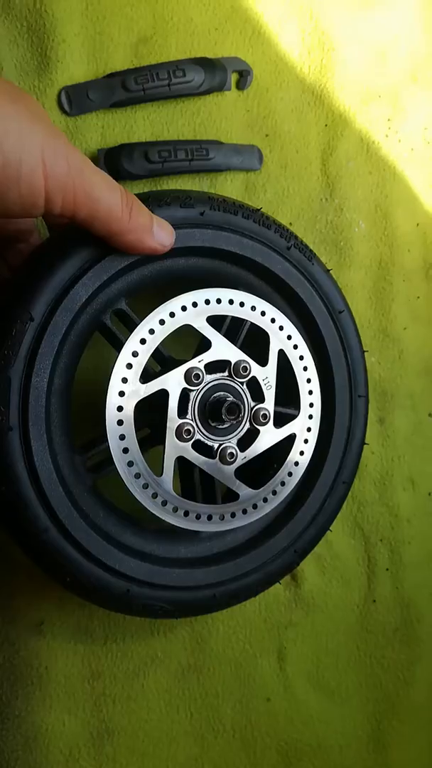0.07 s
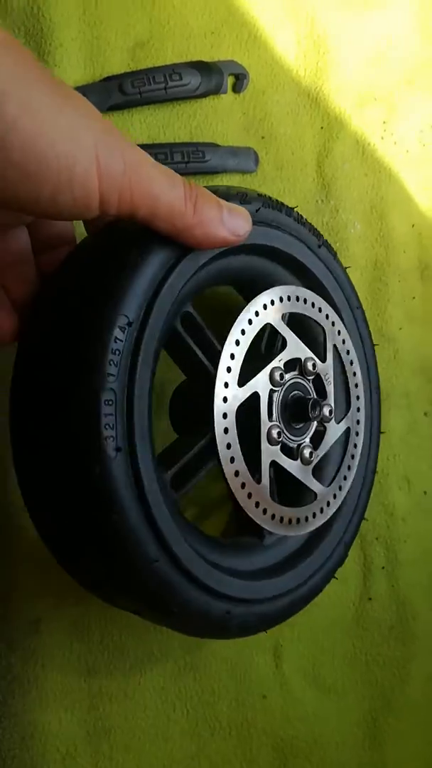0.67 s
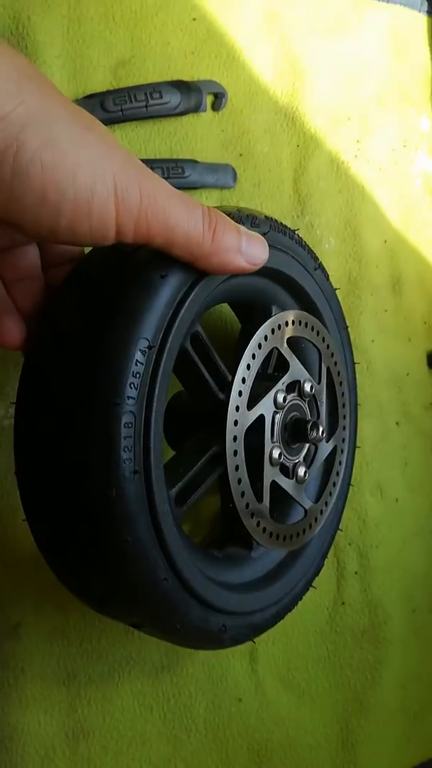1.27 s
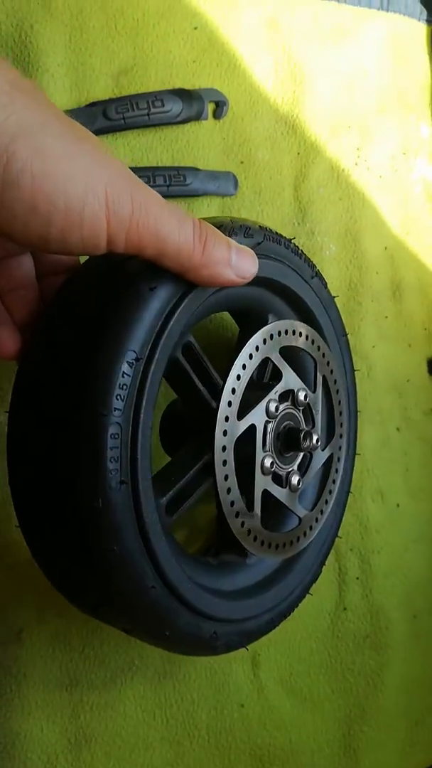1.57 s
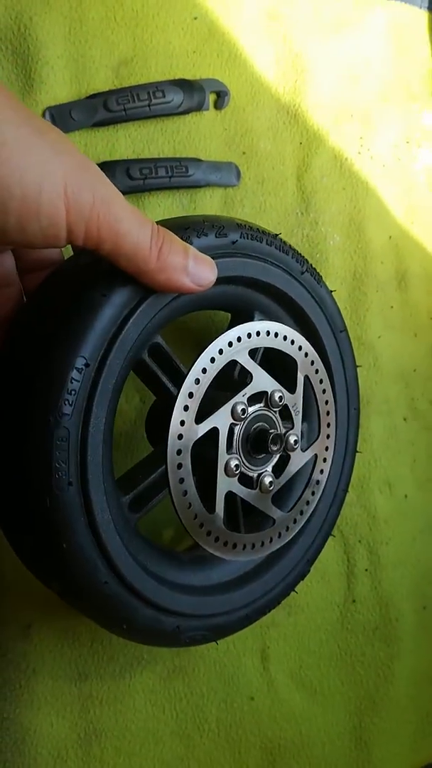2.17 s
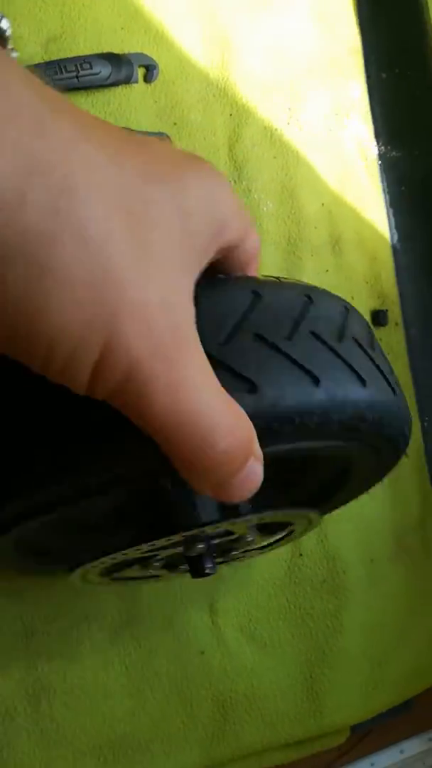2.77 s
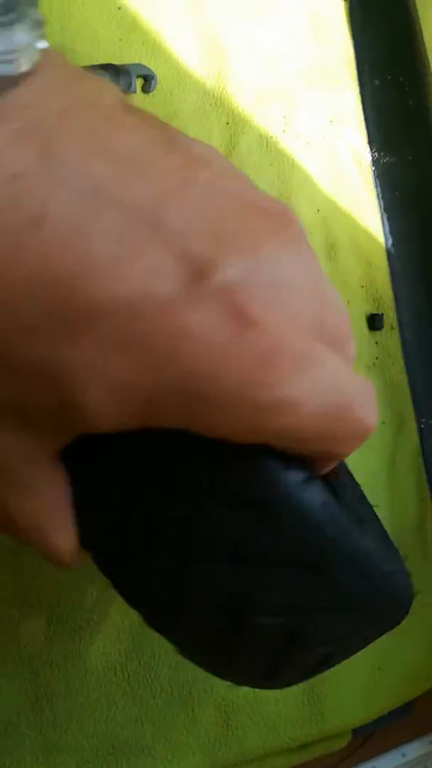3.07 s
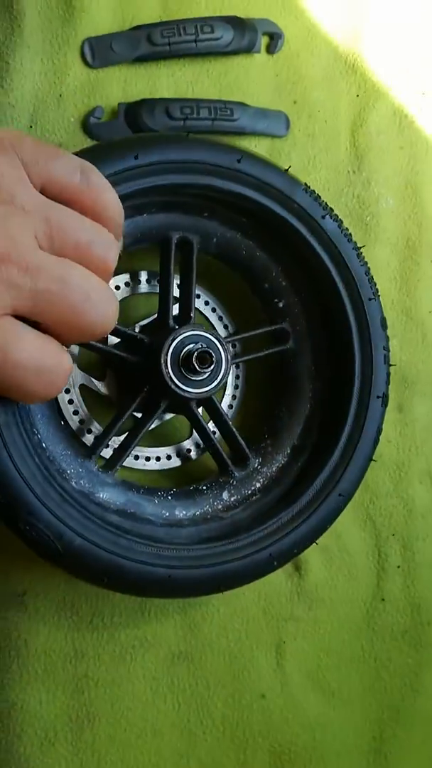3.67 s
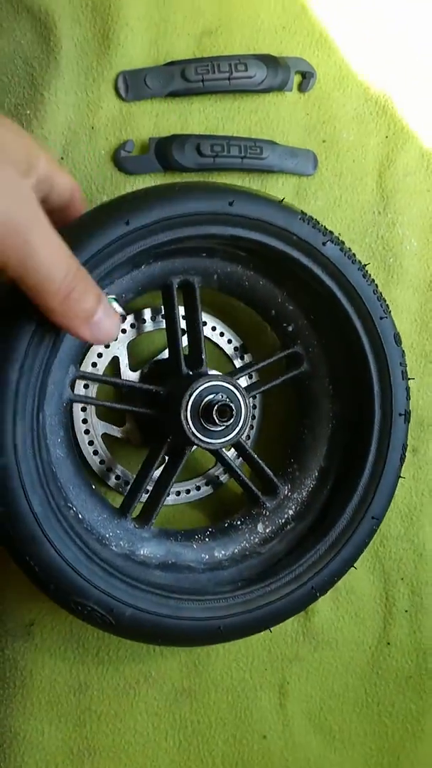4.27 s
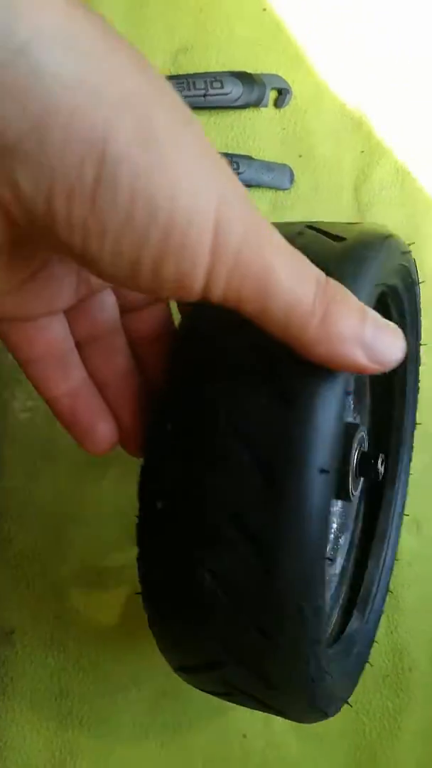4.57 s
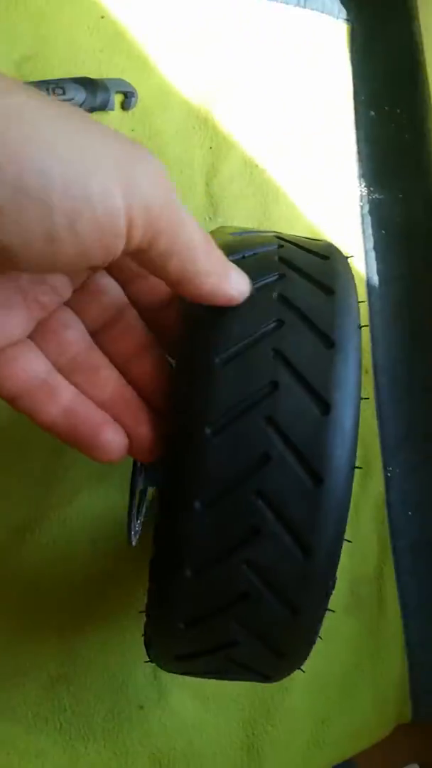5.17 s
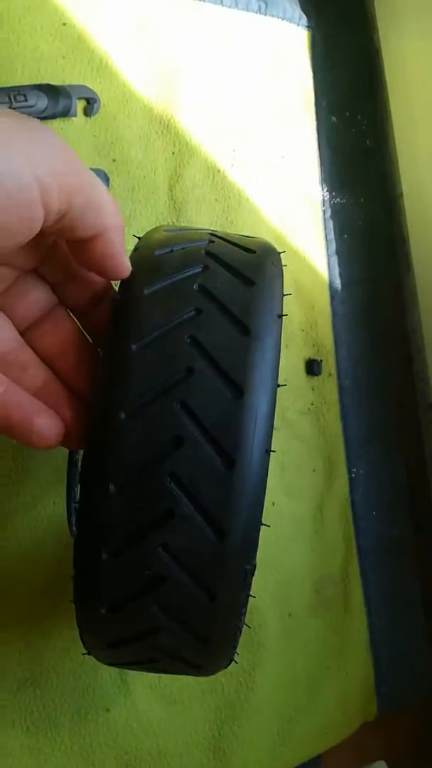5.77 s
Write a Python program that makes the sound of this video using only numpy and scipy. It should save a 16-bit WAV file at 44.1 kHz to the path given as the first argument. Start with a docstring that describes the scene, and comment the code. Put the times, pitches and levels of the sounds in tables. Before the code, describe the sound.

Dull, close thumps of a scooter wheel being turned by hand on cloth, with one bouncing, clacking landing over a faint indoor hum.

```python
"""A low hum and a faint hiss fill a small room. A scooter wheel rumbles as it is tilted and turned by hand
on a cloth-covered table, amid dull, close handling thumps, each a low swing that sinks in pitch.
Fingers tick on the wheel, and friction on the cloth gives a swish and a stick-slip rasp.
The wheel lands once: the modes of the inflated tyre boom as it bounces, and those of the metal clack.
Then the tread rolls in short runs of bumps, among further thumps of handling."""
import sys
import numpy as np
from scipy import signal
from scipy.fft import rfft, irfft
from scipy.io import wavfile

SR = 44100
rng = np.random.default_rng(int(sys.argv[2]) if len(sys.argv) > 2 else 0)


def master_out(mix):
    """Clip the mix to full scale and print it as 16-bit PCM to the path in sys.argv[1]."""
    frames = np.transpose(np.atleast_2d(mix))
    ceiling = np.clip(frames, -1, 1)
    pcm = np.round(ceiling * 32767).astype(np.int16)
    wavfile.write(sys.argv[1], SR, pcm)


N = 265217
TIME = np.arange(N) / SR


def from_db(db):
    """Amplitude grows tenfold for every 20 dB."""
    return 10 ** (np.asarray(db) / 20)


def rms_one(x):
    """Normalisation to unit rms."""
    return x / np.sqrt(np.mean(x ** 2) + 1e-20)


def peak_one(x):
    """Normalisation to unit peak."""
    return x / np.abs(x).max()


def at_hz(points, hz):
    """Interpolation of (Hz, value) points on a logarithmic frequency axis."""
    point_hz, value = np.transpose(points)
    return np.interp(np.log(hz), np.log(point_hz), value)


def cut(x, hz, kind, order):
    """Butterworth filtering, maximally flat in the passband."""
    return signal.sosfilt(signal.butter(order, np.minimum(hz, .45 * SR), kind, fs=SR, output="sos"), x)


def resonance(x, hz, width_hz, order):
    """A resonator selects a band of its excitation; the result has unit rms."""
    return rms_one(cut(x, [hz - width_hz / 2, hz + width_hz / 2], "band", order))


def add(track, start_s, sound):
    """Superposition: a sound adds to the track from its start time."""
    at = round(start_s * SR)
    track[..., at:at + sound.shape[-1]] += sound[..., :N - at]


def noise(spectrum, pan=None):
    """Partial coherence: coloured stereo noise of unit rms, alike on both sides only in the bass."""
    # Each row: frequency in Hz, correlation of left and right.
    coherence = [(60, 0.99), (130, 0.9), (290, 0.12), (640, -0.55), (1400, 0.35), (3100, 0), (15000, 0)]
    hz = np.maximum(np.fft.rfftfreq(N, 1 / SR), 1)
    mid, side = rfft(rng.standard_normal((2, N)))
    alike = np.clip(at_hz(coherence, hz), -1, 1)
    sign = np.array([[1], [-1]])
    low_hz, high_hz = spectrum[0][0], spectrum[-1][0]
    skirts = np.minimum(hz / low_hz, 1) ** 2 * np.minimum(high_hz / hz, 1) ** 2
    gain = from_db(at_hz(spectrum, hz)) * skirts
    if pan:
        tilt = from_db(sign * at_hz(pan, hz) / 2)
        gain = gain * tilt / tilt.mean(axis=0)
    channels = np.sqrt(1 + alike) * mid + np.sqrt(1 - alike) * sign * side
    return rms_one(irfft(gain * channels, N))


def strokes(movements, rise_db_per_s, fall_db_per_s):
    """Exponential envelopes: each movement sets in, glides between two levels and dies away."""
    gain = np.zeros(N)
    for start, end, start_db, end_db in movements:
        level_db = np.interp(TIME, [start, end], [start_db, end_db])
        drop_db = rise_db_per_s * np.maximum(start - TIME, 0) + fall_db_per_s * np.maximum(TIME - end, 0)
        gain += from_db(np.maximum(level_db - drop_db, -200))
    return gain


def background(hum_hz=131.2, whine_hz=14408):
    """Narrow-band noise wavers, giving a low hum amid broadband hiss and a very faint whine."""
    # Each row: frequency in Hz, relative spectral density in dB.
    air_spectrum = [(15, -29.5), (25, 0), (59, -6), (92, -18), (134, -11), (153, -20), (185, -15),
                    (240, -24), (326, -24), (420, -26.5), (1400, -29.5), (2350, -30.5), (4500, -32.5),
                    (8590, -34.8), (14800, -35), (16000, -37)]
    # Faint resonances in the hiss. Each row: centre in Hz, bandwidth in Hz, level in dB.
    air_tones = [(2380, 160, -87), (3500, 160, -91)]
    # Each row: time in seconds, level in dB.
    hum_levels = [(0.1, -74), (0.35, -62), (1.1, -66.5), (1.8, -71), (6.0, -70.5)]
    tones = sum(from_db(db) * resonance(rng.standard_normal((2, N)), hz, width_hz, order=2)
                for hz, width_hz, db in air_tones)
    hum = resonance(rng.standard_normal(N), hum_hz, width_hz=16, order=2)
    hum_db = np.interp(TIME, *np.transpose(hum_levels))
    whine = rms_one(np.sin(2 * np.pi * whine_hz * TIME))
    return from_db(-65.8) * noise(air_spectrum) + tones + from_db(hum_db) * hum + from_db(-93) * whine


def rumble():
    """Handling noise: the wheel vibrates at low frequencies while it shifts in the hand."""
    # Each row: start and end in seconds, first and last level in dB.
    shifts = [(0.29, 1.503, -54.5, -55.5), (1.69, 2.499, -61.5, -60.5), (2.56, 2.67, -57, -50),
              (3.348, 3.625, -54, -58), (4.009, 4.94, -63.5, -60), (5.19, 5.35, -57.5, -55)]
    # Each row: frequency in Hz, relative spectral density in dB.
    spectrum = [(25, -6), (50, 7), (90, -2.5), (160, -6.5), (300, -21), (600, -19)]
    return strokes(shifts, rise_db_per_s=141, fall_db_per_s=116) * noise(spectrum)


def bump(db, start_hz, edge_hz, relaxed_hz=54.7, sag_s=0.0056, decay_s=0.011):
    """A damped oscillator: one low swing whose pitch sinks as it dies away."""
    t = TIME[:6000]
    hz = relaxed_hz + (start_hz - relaxed_hz) * np.exp(-t / sag_s)
    swing = np.sin(2 * np.pi * np.cumsum(hz) / SR) * np.exp(-t / decay_s)
    softened = cut(swing, edge_hz, "low", order=3)  # a softer contact has a lower edge
    bass_cut_hz = 30 + 4.5 * max(db + 22, 0)  # above -22 dB a contact is too brief to push deep bass
    return from_db(db) * peak_one(cut(softened, bass_cut_hz, "high", order=2))


def smack(edge_hz):
    """Abrupt contact gives one band-limited pulse, opposite in sign to the low swing."""
    impulse = signal.unit_impulse(1000) + 1e-18
    pulse = cut(impulse, edge_hz, "low", order=5)
    return -peak_one(cut(pulse, 0.088 * edge_hz, "high", order=2))


def thumps():
    """Impact excitation: dull, close handling thumps, each a smack and a low swing that sinks in pitch."""
    # Each row: start in seconds, level in dB, initial pitch in Hz, upper spectral edge in Hz,
    # smack in dB relative to the bump.
    contacts = [(0.658, -41.5, 79, 756, 3), (0.681, -45, 220, 730, 7.5), (1.255, -32.0, 89, 674, -37),
                (1.47, -40, 50.3, 160, -27), (1.736, -33, 80.5, 176, -17), (1.777, -44.5, 223, 614, -0.5),
                (1.7803, -34.5, 128, 423, -9.5), (1.88, -40, 99, 262, -26), (1.929, -36, 145, 534, -6.5),
                (2.02, -38, 84, 1150, -15), (2.159, -46.5, 115, 700, -33), (2.5824, -22, 141, 1900, -19),
                (2.5852, -9.5, 234.3, 1020, -5), (2.6205, -15.5, 292, 2200, -12.5),
                (2.642, -31, 173, 1600, -4), (3.105, -39.0, 100, 230, -31), (3.2767, -36, 197, 652, -5.5),
                (4.153, -43, 142, 242, -31), (4.316, -46, 70, 210, -13), (4.496, -20.5, 184, 724, -25),
                (4.5192, -29, 200, 437, -35), (4.7461, -23, 208, 590, -4.5), (4.9117, -20, 233, 426, -9.5),
                (4.9201, -33, 207, 440, -22), (4.9405, -31, 116, 355, -11), (4.976, -31, 235, 310, -37),
                (4.9925, -29, 220, 292, -32), (5.008, -32, 103, 230, -7), (5.185, -38.5, 116, 324, -4),
                (5.227, -31, 184, 260, -23), (5.2473, -27, 219, 587, -30), (5.279, -36.5, 185, 540, -21),
                (5.292, -38, 145, 430, -5), (5.312, -42, 295, 430, -24), (5.3275, -23.5, 213, 426, -35)]
    out = np.zeros(N)
    for start, db, start_hz, edge_hz, smack_db in contacts:
        add(out, start, bump(db, start_hz, edge_hz))
        add(out, start, from_db(db + smack_db) * smack(edge_hz))
    return out


def from_right(x, lag_s, shade_db, shade_hz):
    """Time and level differences: the left lags and has less treble; negative values swap the sides."""
    bass = cut(x, shade_hz, "low", order=1)
    upper = x - bass
    left = np.interp(TIME - lag_s / 2, TIME, bass + from_db(-shade_db) * upper)
    right = np.interp(TIME + lag_s / 2, TIME, bass + from_db(shade_db) * upper)
    return np.array([left, right])


def room(x, t60, build_s=0.008, size=22050):
    """Reverberation: diffuse reflections build up quickly and decay exponentially."""
    # Each row: frequency in Hz, relative spectral density in dB.
    spectrum = [(100, -4.5), (200, -0.5), (500, -6), (1000, -4.5), (2500, -8), (6000, -13.5), (14000, -34)]
    t = TIME[:size]
    tail = noise(spectrum)[:, :size] * from_db(-60 * t / t60) * (1 - np.exp(-t / build_s))
    tail /= np.sqrt(np.sum(tail ** 2) / 2)
    return signal.fftconvolve(x[None], tail, axes=1)[:, :N]


def ticks(attack_s=0.0003, size=6000):
    """Light taps and scuffs make noise transients, dull from a fingertip, bright from nail or fitting."""
    # Each row: start in seconds, peak in dB, lower and upper band edge in Hz, decay in seconds,
    # left over right in dB.
    taps = [(2.338, -51, 7000, 9000, 0.024, -1), (2.35, -50.5, 700, 5000, 0.0036, 11),
            (2.347, -53.5, 330, 440, 0.027, -2), (2.507, -39.5, 3030, 5000, 0.0014, 0),
            (2.5846, -36, 1600, 2210, 0.00071, -2), (3.296, -33.5, 2480, 3520, 0.0032, 5),
            (3.310, -34, 2010, 3250, 0.0056, 0), (3.31, -45, 5900, 6560, 0.0047, 12),
            (3.5184, -46.5, 1500, 11800, 0.00086, -12), (3.5186, -47.5, 1020, 1640, 0.0013, -4),
            (4.064, -63, 700, 1030, 0.0074, -5), (4.08, -63, 1000, 4000, 0.058, 0),
            (4.113, -61, 7000, 11000, 0.0057, -2), (4.241, -40, 167, 260, 0.0097, -0.5),
            (4.253, -60.5, 7500, 10500, 0.0053, 6), (4.324, -51, 173, 284, 0.025, 3),
            (4.495, -58, 1400, 2000, 0.0018, -9), (4.496, -56, 740, 950, 0.0079, -7),
            (4.7455, -59.5, 1200, 1900, 0.0014, -6), (4.91, -55, 1410, 1970, 0.002, -10),
            (4.912, -52.5, 680, 990, 0.0045, -6), (5.245, -61, 900, 1900, 0.0015, 0),
            (5.955, -60.5, 990, 3980, 0.071, 2)]
    out, t = np.zeros((2, N)), TIME[:size]
    for start, db, low_hz, high_hz, decay_s, pan_db in taps:
        burst = rng.standard_normal((2, size)) * np.exp(-t / decay_s) * (1 - np.exp(-t / attack_s))
        snap = peak_one(cut(burst, [low_hz, high_hz], "band", order=2))
        sides = from_db([[pan_db / 2], [-pan_db / 2]])
        add(out, start, from_db(db) * sides * snap)
    return out


def brushing(grain_db=1.3, grain_hz=110):
    """Sliding friction: rubber drags over the fibres of the cloth in a slightly grainy swish."""
    # Each row: start and end in seconds, first and last level in dB.
    drags = [(2.507, 2.6, -63, -62), (2.62, 2.695, -51, -53), (3.304, 3.369, -57, -56)]
    # Each row: frequency in Hz, relative spectral density in dB.
    spectrum = [(180, -18), (300, -14.5), (455, -31.5), (614, -17), (1280, -5.5), (1390, -7.5),
                (2650, -9.5), (3460, -6.5), (5900, -15), (7500, -11.5), (11000, -22), (16000, -28.5)]
    # Each row: frequency in Hz, left over right in dB.
    pan = [(400, 1.5), (1300, -4.5), (2400, -2), (4400, -3), (8100, 41.5), (15000, 9.5)]
    grain = from_db(grain_db * rms_one(cut(rng.standard_normal(N), grain_hz, "low", order=2)))
    return strokes(drags, rise_db_per_s=903.5, fall_db_per_s=251) * grain * noise(spectrum, pan)


def rasp(slips_per_s=690, spread_db=3):
    """Stick-slip friction: rubber catches on the cloth, and its uneven slips excite broad resonances."""
    # Each row: centre in Hz, bandwidth in Hz, relative level in dB before the high-pass.
    bands = [(3150, 240, 2.5), (3870, 600, 2), (5070, 1800, -2)]
    # Each row: start and end in seconds, first and last level in dB.
    catches = [(2.511, 2.69, -64, -64), (3.345, 3.38, -61, -58)]
    slipping = rng.random(N) < slips_per_s / SR
    slips = slipping * from_db(spread_db * np.clip(rng.standard_normal(N), -2, 2)) + 1e-18
    ringing = sum(from_db(db) * resonance(slips, hz, width_hz, order=1) for hz, width_hz, db in bands)
    treble = rms_one(cut(ringing, 3700, "high", order=4))
    envelope = strokes(catches, rise_db_per_s=4000, fall_db_per_s=350)
    return from_right(envelope * treble, lag_s=0.0001, shade_db=-7, shade_hz=400)


def ring(modes, spread_db, tension=0, relax_s=0.041):
    """A struck body rings in damped modes; added tension makes them start sharp and sink."""
    t = TIME[:22050]
    warped = t + tension * relax_s * (1 - np.exp(-t / relax_s))
    return sum(from_db(db - spread_db * rng.normal() - 60 * t / t60) * np.sin(2 * np.pi * hz * warped)
               for hz, db, t60 in modes)


def bounces(soft_hz=350, bass_cut_hz=52):
    """Modal vibration under tension: the inflated tyre booms as it lands and rocks to rest."""
    # Each row: start in seconds, gain in dB.
    landings = [(3.2913, -26), (3.2995, -11), (3.3075, -27.5), (3.3208, -25), (3.3557, -27), (3.4144, -39),
                (3.4911, -42)]
    # Each row: frequency in Hz, relative level in dB, time to fall 60 dB in seconds.
    tyre_modes = [(58, -24.5, 0.26), (120.5, -3.5, 0.07), (130, -14.5, 0.39), (146, -18, 0.32),
                  (195, -23.5, 0.26), (245, -18.5, 0.105), (326, -22, 0.22)]
    out = np.zeros(N)
    for start, db in landings:
        boom = ring(tyre_modes, spread_db=0, tension=0.07)
        add(out, start, from_db(db) * cut(boom, soft_hz, "low", order=2))
    return cut(out, bass_cut_hz, "high", order=2)


def clacks(crack_s=0.005):
    """Cushioned impact: brake disc and axle knock through cloth with a crack and an inharmonic ring."""
    # Each row: start in seconds, gain in dB, upper spectral edge in Hz.
    knocks = [(3.294, -34.5, 2670), (3.2993, -22.5, 1130), (3.31, -12, 1570), (3.3207, -36, 2600),
              (3.340, -47, 810)]
    # Each row: frequency in Hz, relative level in dB, time to fall 60 dB in seconds.
    metal_modes = [(332, -4, 0.05), (506, -9, .1), (600, -7.5, .07), (655, -12, 0.16), (870, -15.5, 0.1),
                   (990, -5.5, 0.11), (1060, -2, 0.03), (1247, -2.5, 0.03), (1430, -7.5, 0.03),
                   (1790, -21, 0.08), (1975, -14, 0.05), (3000, 3, 0.025), (3325, -4, 0.12)]
    out = np.zeros(N)
    for start, db, edge_hz in knocks:
        body = from_db(-17) * ring(metal_modes, spread_db=3.5)
        burst = rng.standard_normal(len(body)) * np.exp(-TIME[:len(body)] / crack_s)
        crack = cut(burst, 450, "high", order=2)
        add(out, start, from_db(db) * cut(body + crack, edge_hz, "low", order=3))
    return out


def rolls(gap_s=0.019, jitter=0.342, spread_db=2):
    """Tread impact: blocks meet the table one after another in an uneven pulse train."""
    # Each row: start and length in seconds, level in dB, initial pitch of each bump in Hz.
    runs = [(3.559, 0.069, -42.5, 70), (4.554, 0.064, -43, 110), (4.845, 0.095, -47, 169),
            (5.795, 0.047, -43.5, 94)]
    out = np.zeros(N)
    for start, length, db, start_hz in runs:
        blocks = int(length / gap_s) + 1
        scatter = rng.standard_normal((16, 2))
        for k, (late, weak) in enumerate(scatter[:blocks]):
            contact_s = start + gap_s * (k + jitter * late)
            add(out, contact_s, bump(db - spread_db * weak, start_hz, edge_hz=280))
    return out


def scene():
    """Superposition of the close sounds, the reflections of the impacts and the background."""
    bumps, boom, metal = thumps() + rolls(), bounces(), clacks()
    handling = from_right(bumps, lag_s=0.00068, shade_db=2, shade_hz=200.5)
    landing = from_right(boom + metal, lag_s=-0.00014, shade_db=-0.5, shade_hz=400)
    reflections = room(from_db(-38) * bumps + from_db(-26) * boom + from_db(-17) * metal, t60=0.26)
    return handling + landing + reflections + rumble() + ticks() + brushing() + rasp() + background()


def record(dry, start_s=0.075, fade_s=0.066, cutoff_hz=15900):
    """Band limiting: after a short fade-in, a steep low-pass removes the highest treble."""
    fade_in = np.clip((TIME - start_s) / fade_s, 0, 1) ** .5
    low_pass = signal.ellip(12, .1, 80, cutoff_hz, fs=SR, output="sos")
    return signal.sosfilt(low_pass, dry * fade_in)


dry = scene()
out = record(dry)
master_out(out)
```